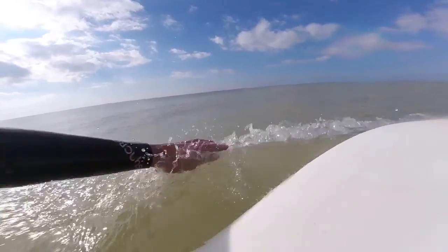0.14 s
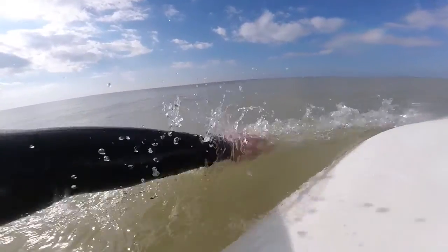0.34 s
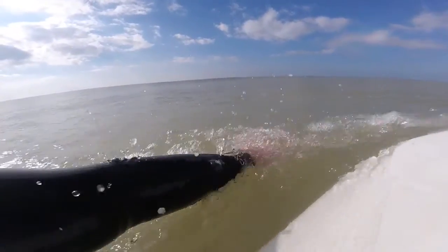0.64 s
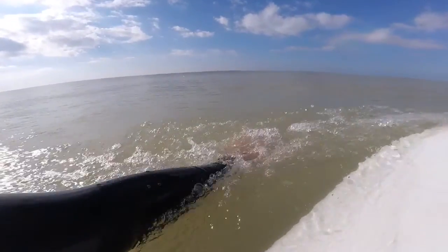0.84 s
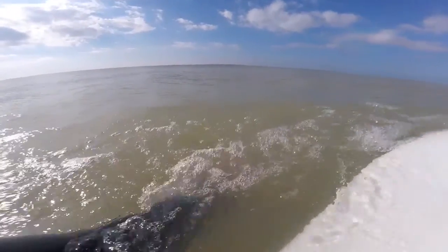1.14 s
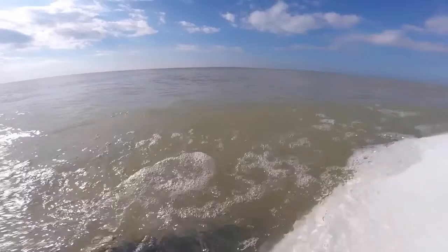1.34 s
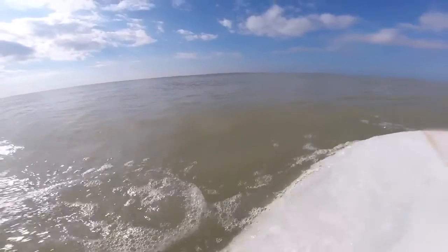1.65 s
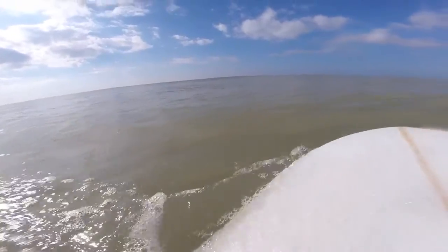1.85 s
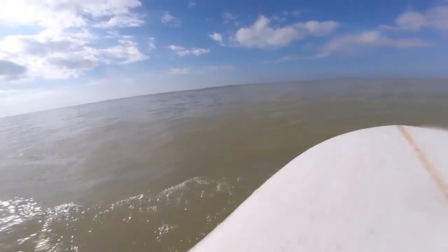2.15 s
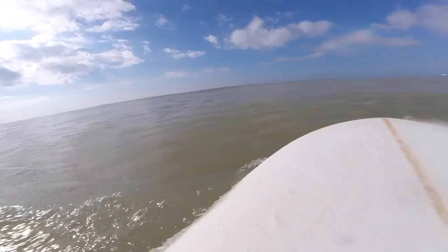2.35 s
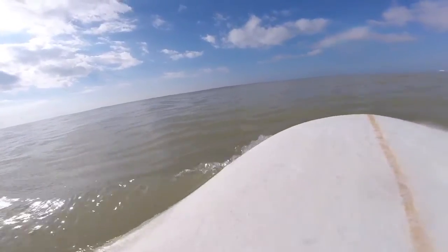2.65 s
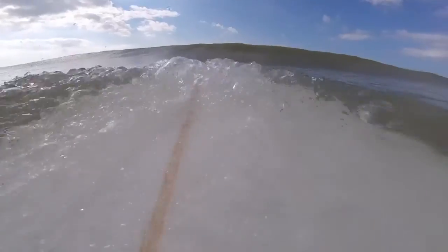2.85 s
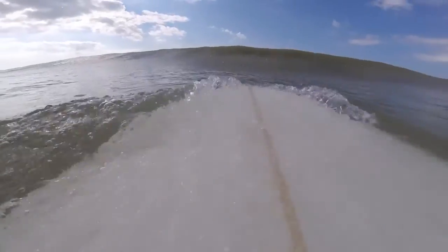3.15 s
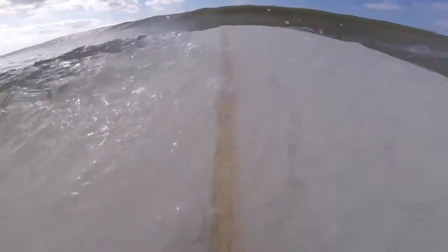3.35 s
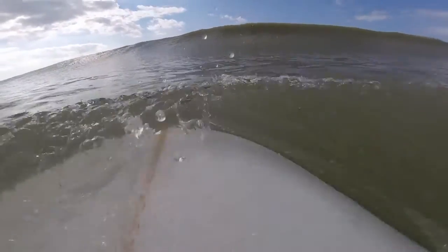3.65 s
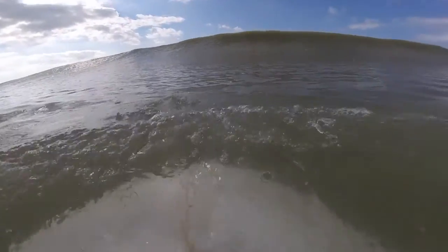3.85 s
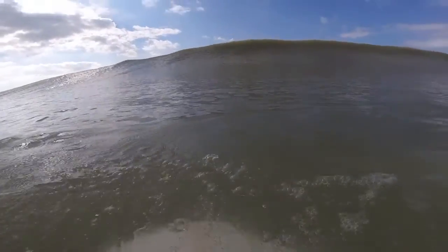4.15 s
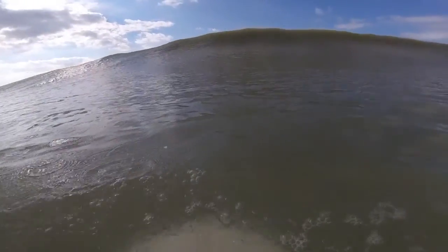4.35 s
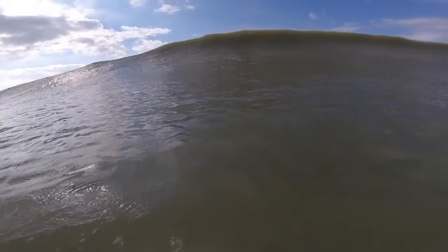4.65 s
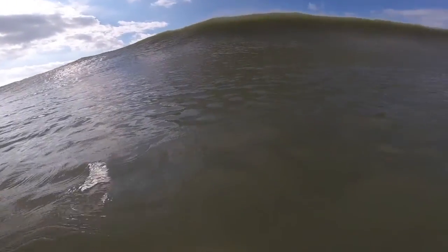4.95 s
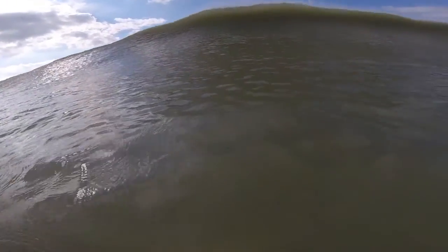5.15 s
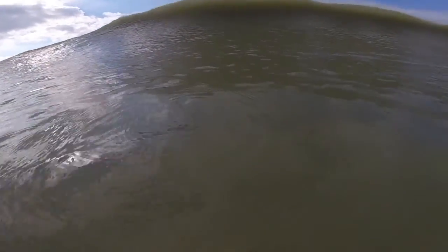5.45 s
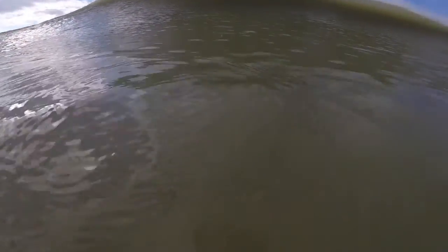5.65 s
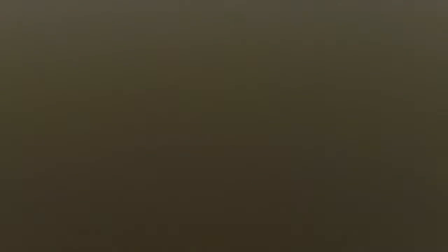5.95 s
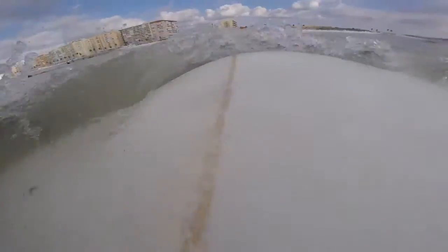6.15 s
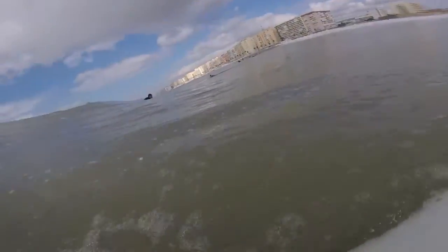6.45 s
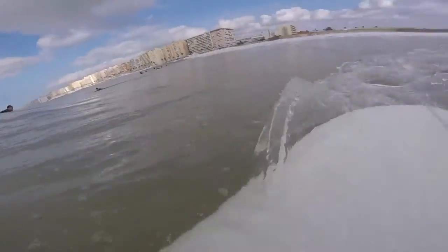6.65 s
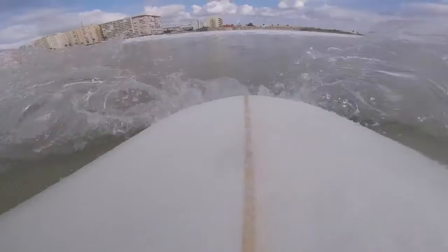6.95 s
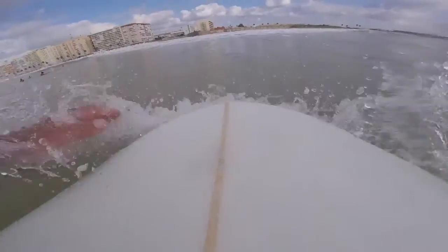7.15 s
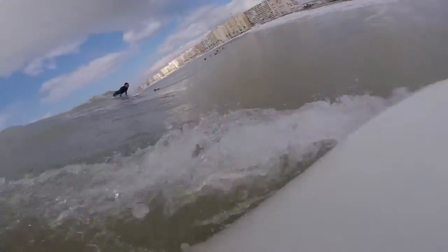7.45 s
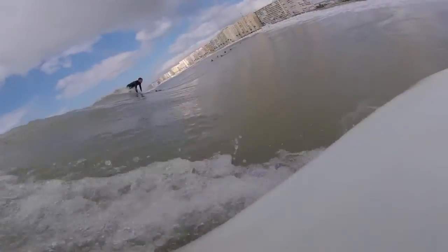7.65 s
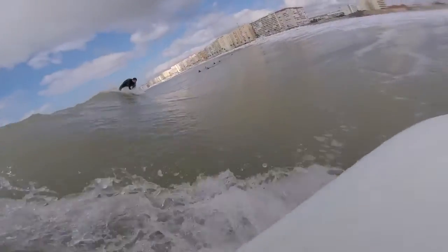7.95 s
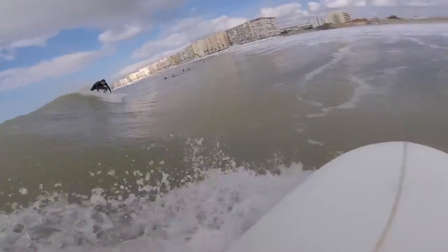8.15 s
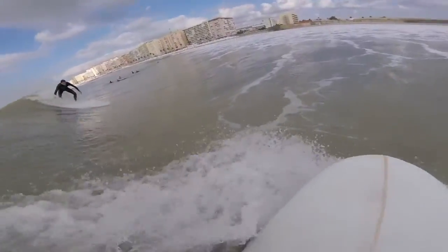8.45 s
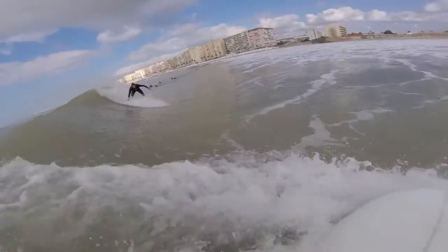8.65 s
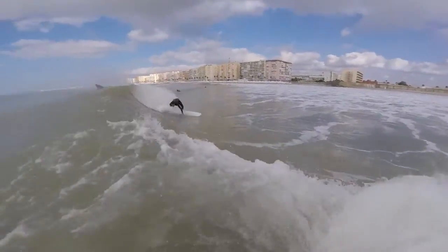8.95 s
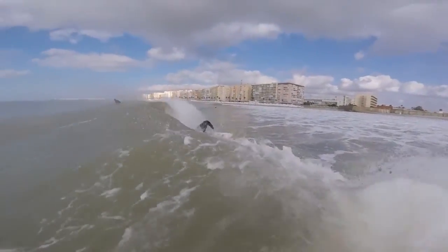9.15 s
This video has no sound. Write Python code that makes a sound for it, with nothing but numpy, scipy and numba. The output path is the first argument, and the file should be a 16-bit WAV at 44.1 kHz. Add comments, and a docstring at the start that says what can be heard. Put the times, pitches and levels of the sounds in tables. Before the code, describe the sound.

Close surf splashing and bubbling along a board, low wind buffeting, a hard underwater gulp, then dull, swelling churn.

```python
"""Surfboard camera ride with a dunk

Wind buffets the camera port, water gurgles and froths along the hull, spray fizzes: band noise plus bubble swarms.
Slaps, large bubbles and drops are damped tones; snaps are pulses; sloshes and splashes are bursts of banded noise.
Four spliced shots, each with its own filter; the first and third play at half speed, so the port rings lower.
A wave dunks the camera late in the third shot; water left in the port muffles the last one."""
import sys
import numpy as np
from scipy import signal
from scipy.fft import rfft, irfft, next_fast_len
from scipy.io import wavfile
from scipy.ndimage import uniform_filter1d
from numba import njit

SR = 44100
rng = np.random.default_rng(int(sys.argv[2]) if len(sys.argv) > 2 else 0)


def put_to_file(sound):
    """Save the sound as 16-bit audio at rate SR, in the file named by the first command-line argument."""
    columns = np.atleast_2d(sound).T  # one column per channel
    safe = np.clip(columns, -1, 1)
    whole_steps = np.round(safe * 32767)
    wavfile.write(sys.argv[1], SR, whole_steps.astype(np.int16))


N = 410118

WIND_TOP_HZ, GURGLE_TOP_HZ, FROTH_TOP_HZ = 110, 900, 2300  # crossovers between the flows
TOP_HZ = 13500  # treble limit
DULL_HZ = 3000  # slaps and bubbles lose treble through water and plastic


def undb(db):
    """Decibels to gain."""
    return 10 ** (np.asarray(db) / 20)


def level(x, db):
    """Scale to an rms level in dB."""
    return x * undb(db) / np.sqrt(np.mean(x ** 2))


@njit
def ring(rows, length, rate):
    """Damped gliding tones from rows (s, size, Hz, Hz/s, t60 s, rise s)."""
    out = np.zeros(length)
    for s, size, hz, glide, t60, rise in rows:
        start = int(s * rate)
        fall = np.exp(-np.log(1000) / (t60 * rate))
        unrisen_decay = np.exp(-1 / (rise * rate))
        step = 2 * np.pi * hz / rate
        step_change = 2 * np.pi * glide / rate ** 2
        phase, unrisen = 0., 1.
        for i in range(start, min(length, start + int(t60 * rate))):
            phase += step
            step = max(step + step_change, 0.)
            size *= fall
            unrisen *= unrisen_decay
            out[i] += size * (1 - unrisen) ** 2 * np.sin(phase)
    return out


def played(table):
    """Ring a table whose second column is a level in dB."""
    rows = np.array(table, float)
    gain = undb(rows[:, 1])
    return ring(np.column_stack([rows[:, 0], gain, rows[:, 2:]]), N, 1. * SR)


def walk(rate):
    """Random levels held for 1 / rate s, then smoothed twice over that time."""
    hold = int(SR / rate)
    steps = np.repeat(rng.standard_normal(N // hold + 1), hold)
    return 1.01 * uniform_filter1d(uniform_filter1d(steps, hold), hold)[:N]


def hiss(lo_hz, hi_hz, surge_db, own_db, rate):
    """Noise in bands half an octave apart that share one surge and flicker alone; rms 1."""
    out = 0
    hz = np.fft.rfftfreq(next_fast_len(N), 1 / SR)
    for centre in np.arange(np.log2(lo_hz), np.log2(hi_hz), .5):
        mask = np.cos(np.pi * np.clip(np.log2(hz + 1e-9) - centre, -.5, .5))
        noise = np.exp(2j * np.pi * rng.random(len(hz))) * np.sqrt(rng.exponential(size=len(hz)))
        band = irfft(mask * noise)[:N]
        out = out + undb(surge_db + own_db * walk(rate)) * band
    return level(out, 0)


def swarm(count, lo_hz, hi_hz, cycles, scatter_db, glide):
    """Bubbles at random times; higher ones tend to die sooner, all rise by a share of their pitch; rms 1."""
    place, pitch, size, life = rng.random((count, 4)).T
    hz = lo_hz + (hi_hz - lo_hz) * pitch
    t60 = cycles * (.5 + life) / hz
    gain = undb(-scatter_db * np.log(1.01 - size)) / np.sqrt(t60)
    rows = np.column_stack([place * N / SR, gain, hz, glide * hz / t60, t60, 0.36 / hz])
    return level(ring(rows, N, 1. * SR), 0)


def crackle(rate, scatter_db):
    """One-sample pops of scattered size and random sign, rate per second; rms 1."""
    size = undb(-scatter_db * np.log(1.005 - rng.random(N)))
    return level((rng.random(N) < rate / SR) * size * rng.choice([-1, 1], N), 0)


# shot boundaries: (time [s])
CUTS_S = [0, 2.733, 3.483, 6.005, 9.4]
# relative colour through the housing, one list per shot: (frequency [Hz], density [dB per Hz])
COLOURS = [
    [(15, -7), (25, -2.5), (118, -12), (205, -13.5), (391, -18.5), (1240, -26), (2110, -36), (2750, -30),
     (3210, -19.5), (3830, -27.5), (4680, -29.5), (5000, -34.5), (6500, -77.5), (11000, -120)],
    [(15, -40.5), (25, 3), (41, -29), (60, -22.5), (203, -25), (262, -23), (384, -22.5), (563, -24),
     (805, -23), (2810, -26.5), (4230, -31.5), (5900, -30.5), (6530, -18.5), (9340, -33), (11200, -54),
     (14500, -77), (22000, -120)],
    [(15, -25.5), (25, 5.5), (49, -1), (169, -9.5), (278, -10), (458, -15.5), (865, -19), (2250, -33),
     (2880, -27.5), (3300, -16), (3620, -22), (4750, -33.5), (5700, -49), (7410, -57), (12500, -120)],
    [(15, -34.5), (25, 0), (81, -4.5), (161, -3.5), (230, -8.5), (356, -10), (593, -14.5), (1070, -16.5),
     (1650, -14.5), (1870, -17.5), (2650, -30.5), (3630, -44.5), (4570, -57), (5900, -55.5), (6530, -44.5),
     (11200, -69.5), (14500, -103), (22000, -120)],
]
# port resonances and treble limit per shot: ([(frequency [Hz], width [Hz], boost [dB])], top [Hz])
PORTS = [([(2720, 150, 10), (3310, 93, 8.5)], 4990), ([(6570, 250, 6)], 11600), ([(3233, 70, 8)], 5750),
         ([(1645, 630, 6), (6400, 250, 2.5)], 36000)]
CROSSFADE_S = .008


def housing(x, lo_hz, hi_hz):
    """Each shot colours the band lo-hi with its own causal response; rms 1 per shot before fades."""
    out, size = np.zeros(N), 2 ** 18
    hz = np.fft.rfftfreq(size, 1 / SR) + 1e-3
    edges = -10 * np.log10((1 + (lo_hz / hz) ** 6) * (1 + (hz / hi_hz) ** 6))
    for colour, (peaks, top_hz), t0, t1 in zip(COLOURS, PORTS, CUTS_S, CUTS_S[1:]):
        f, db = np.transpose(colour)
        db = np.interp(np.log(hz), np.log(f), db) + edges
        db = db - 10 * np.log10(1 + (hz / top_hz) ** 80)
        db = db + sum(boost / (1 + (2 * (hz - at) / width) ** 2) for at, width, boost in peaks)
        # folded cepstrum = minimum phase: grains keep sharp starts
        cep = irfft(np.log(undb(db) + 1e-9))
        cep = np.r_[cep[0], 2 * cep[1:size // 2], np.zeros(size // 2)]
        response = np.exp(rfft(cep))
        a, b = max(int(t0 * SR) - SR // 4, 0), min(int(t1 * SR), N)
        shot = level(irfft(rfft(x[a:b], size) * response)[:b - a], 0)
        # fade in just before the cut while the previous shot fades out
        t = np.arange(a, b) / SR
        fade = np.clip((t - t0) / CROSSFADE_S + 1, 0, 1) * np.clip((t1 - t) / CROSSFADE_S, 0, 1)
        out[a:b] += np.sin(fade * np.pi / 2) * shot
    return out


def shot_top(x):
    """Single events lose the treble above the limit of their shot."""
    out = np.zeros(N)
    for (_, top_hz), t0, t1 in zip(PORTS, CUTS_S, CUTS_S[1:]):
        a, b = int(t0 * SR), int(t1 * SR)
        lowpass = signal.butter(9, min(top_hz, TOP_HZ), fs=SR, output="sos")
        out[a:b] = signal.sosfiltfilt(lowpass, x)[a:b]
    return out


def wind(surge):
    """Gusty pressure swings on the port: flickering low noise."""
    surge_db = 2.0 * surge + 1.0 * walk(7.8)
    return housing(hiss(11.94, 250, surge_db, own_db=5.0, rate=8.6), 21, WIND_TOP_HZ)


def gurgle(surge):
    """Churning water along the hull with larger bubbles in it."""
    plops = swarm(count=3500, lo_hz=88.5, hi_hz=1409, cycles=14.8, scatter_db=2.5, glide=0.25)
    churn = hiss(60.1, 2000, 2.9 * surge, own_db=1.0, rate=20)
    return housing(churn + undb(-3.0 + 2.2 * surge) * plops, WIND_TOP_HZ, GURGLE_TOP_HZ)


def froth(surge, patchy, blips_db, crackle_db):
    """Pea-sized bubbles that blip upwards and pop out of a soft rush."""
    blips = swarm(count=1400, lo_hz=481.4, hi_hz=3625, cycles=44, scatter_db=4.0, glide=0.32)
    rush = hiss(445, 4500, 1.0 * surge, own_db=2.4 * patchy, rate=22)
    grains = undb(blips_db) * blips + undb(crackle_db) * crackle(400, scatter_db=5.0)
    return housing(rush + undb(0.89 * surge) * grains, GURGLE_TOP_HZ, FROTH_TOP_HZ)


def spray(surge, patchy):
    """Fizz of tiny bursting bubbles and one-sample crackle over a breathing hiss."""
    fizz = swarm(count=10000, lo_hz=1538, hi_hz=13160, cycles=43, scatter_db=4.0, glide=0.3)
    foam = hiss(1133, 16000, 0.96 * surge, own_db=5.2 * patchy, rate=28)
    grains = undb(-4.5) * fizz + undb(-4.0) * crackle(500, scatter_db=3.5)
    return housing(foam + patchy * undb(0.73 * surge) * grains, FROTH_TOP_HZ, 20000)


# water slapping the housing, before rise and filters: (time [s], level [dB], pitch [Hz], t60 [s])
SLAPS = [(0.012, -9.5, 27, 0.17), (.115, -10, 20, 0.12), (0.701, -7.5, 35, 0.073), (3.408, -1, 45.5, 0.11),
         (3.49, -12, 16, 0.34), (3.63, -7.5, 10, 0.15), (4.09, -14.5, 18.6, 0.28), (5.963, 1, 406, 0.016),
         (5.9641, -4, 930, 0.0085), (5.96, -3, 55, 0.075), (5.99, 0.5, 350, 0.012),
         (5.993, -3, 730, 0.0066), (6.032, -14, 470, 0.019), (6.14, -9.5, 278, 0.038),
         (6.548, -7, 95, 0.091), (6.675, -16.5, 42, .12), (6.716, -11.5, 47, 0.067), (6.865, -7, 25, 0.13),
         (6.93, -11.5, 43, .072), (7.137, -9.5, 870, 0.0078), (7.515, -9.5, 18, 0.13),
         (9.005, -14, 24, .25), (9.0462, -8.5, 460, 0.0061), (9.049, -16, 56, 0.037)]
SLAP_RISE, SLAP_SAG = 0.056, 0.31  # rise [share of t60]; pitch lost over t60 [share]


def slaps():
    """Dull blows that rise in step with their ring and sag in pitch."""
    return played([(s, db, hz, -SLAP_SAG * hz / t60, t60, SLAP_RISE * t60) for s, db, hz, t60 in SLAPS])


# single large bubbles, before rise and filters: (time [s], level [dB], start pitch [Hz], t60 [s])
BUBBLES = [(.042, -7.5, 175, 0.038), (.403, -23, 487, .04), (.53, -21, 497, 0.056),
           (0.556, -16, 1120, 0.013), (.729, -20, 543, 0.025), (.753, -23.5, 1290, 0.02),
           (.973, -19, 1280, 0.016), (1.016, -23, 1700, .015), (1.034, -17.5, 1550, 0.013),
           (1.082, -22, 1100, 0.023), (1.17, -27, 740, .03), (2.742, -25, 2150, 0.031),
           (2.85, -23, 1000, 0.027), (2.888, -14.5, 750, 0.028), (2.975, -26, 895, 0.07),
           (3.019, -25, 870, .03), (3.063, -24, 710, 0.02), (3.111, -26, 1350, 0.025),
           (3.252, -27, 1500, 0.063), (3.288, -26, 446, .03), (3.314, -18.5, 1490, 0.023),
           (3.355, -24, 810, 0.02), (3.332, -17, 956, 0.023), (3.384, -20, 1000, 0.034),
           (3.465, -19.5, 370, 0.053), (3.635, -20.5, 468, .057), (3.76, -28, 940, .03),
           (3.805, -11, 168, 0.068), (3.842, -26, 720, 0.032), (3.89, -26, 880, .03),
           (3.865, -12, 280, 0.044), (3.946, -22.5, 390, 0.046), (3.998, -25.5, 820, 0.029),
           (4.03, -24.5, 330, .04), (4.038, -26, 670, 0.038), (4.065, -21, 177, 0.089),
           (4.068, -25, 550, .03), (4.104, -25, 490, 0.027), (4.133, -28, 1080, .025),
           (4.33, -24, 620, .025), (4.578, -23, 745, 0.018), (5.9825, -4, 164, 0.04),
           (6.032, -8, 855, 0.01), (6.1366, 2, 116, 0.05), (6.563, 6.5, 44, 0.036),
           (9.0464, 3, 1420, 0.0047), (9.23, -22, 640, 0.018), (9.269, -8.5, 89.5, 0.05)]
# air pockets, one glugs upwards as it fills, two hum downwards while trapped:
# (time [s], level [dB], start pitch [Hz], glide [Hz/s], t60 [s], rise [s])
POCKETS = [(4.375, -18, 66, 3050, 0.36, 0.012), (6.0015, -16, 738, -14000, 0.047, 0.0011),
           (6.014, -18, 587, -2000, 0.05, 0.0013)]
BUBBLE_RISE = 0.082  # share of t60
GLIDE_HZ_PER_S, GLIDE_SHARE = 330, 0.32  # constant, plus share of the pitch gained over t60


def bubbles():
    """Bubbles glide upwards, faster when high and short; air pockets follow their own glides."""
    rows = [(s, db, hz, GLIDE_HZ_PER_S + GLIDE_SHARE * hz / t60, t60, BUBBLE_RISE * t60)
            for s, db, hz, t60 in BUBBLES]
    return played(rows + POCKETS)


# drops hitting the housing, plus the port ringing once during the dunk (6.1378 s), before rise and filters: #
# (time [s], ring level [dB], ring pitch [Hz], spatter relative to ring [dB])
DROPS = [(0.049, -24, 2780, -23), (0.1725, -16, 2820, -24), (.181, -27, 2900, -8), (0.1893, -16, 2800, -18),
         (0.2099, -8.5, 2800, -8), (.221, -14, 2800, -6), (0.2428, -12.5, 2780, -15),
         (0.3135, -16.5, 2780, -14), (0.3378, -5.5, 2860, -18), (0.3622, -22.5, 3250, 0.5),
         (.419, -20.5, 3240, -5.5), (0.5015, -15.5, 2700, -24), (0.5548, -21, 3300, -10),
         (.606, -25, 3270, -10), (.66, -23, 3250, -12), (0.693, -27.5, 3280, 1), (0.852, -26.5, 3190, -4.5),
         (.9135, -22, 3360, -6.5), (.9743, -23, 3630, -7.5), (1.0174, -24, 2620, -4),
         (1.098, -21, 2950, -11), (1.0835, -18, 3260, -7.5), (1.1225, -19, 3320, -9.5),
         (1.24, -22.5, 3100, -10), (1.4643, -25, 3220, 3), (2.0015, -22, 2730, -18),
         (2.0025, -20, 3130, -15), (2.8609, -22, 8000, -7), (3.201, -23, 7200, -10.5),
         (3.9762, -28.5, 3330, -5), (3.9996, -26, 3480, -9), (4.022, -27, 3280, -8),
         (4.1902, -24, 3650, -11.5), (4.5633, -26.5, 3260, -11), (4.583, -29, 3290, -4),
         (5.7947, -23, 3470, -12), (5.806, -12.5, 3160, -8.5), (5.9617, -38, 3180, 4.5),
         (6.1378, -31.5, 6550, -30), (6.436, -20, 1720, -25), (6.476, -22, 1790, -25),
         (6.5135, -32, 2300, -4), (6.584, -40, 3430, -5), (7.266, -19, 1500, -25), (7.2777, -8, 1580, -28),
         (7.288, -18, 1550, -20), (7.364, -19, 1650, -21), (7.3908, -23, 1740, -11),
         (7.4082, -11.5, 1700, -19.5), (7.422, -14, 1600, -25), (7.69, -10, 1560, -30),
         (7.8903, -15, 1610, -27), (8.0294, -15.5, 1420, -16), (8.107, -9.5, 1540, -28),
         (8.2313, -10, 1720, -29), (8.5618, -12, 1590, -28), (8.6865, -10.5, 1320, -30),
         (9.249, -20, 1800, -14.5)]
RING_T60_S, WET_RING_T60_S, SPATTER_T60_S = 0.015, 0.013, 0.03  # wet: last shot


def drops():
    """Each drop rings briefly at its own pitch and spatters a burst of wide noise."""
    burst, t = np.zeros(N), np.arange(2000) / SR
    shape = undb(-60 * t / SPATTER_T60_S) * (1 - np.exp(-(t / 0.00053) ** 2))
    rings = []
    for s, db, hz, spatter_db in DROPS:
        start = int(s * SR)
        burst[start:start + len(t)] += undb(db + spatter_db) * shape
        t60 = RING_T60_S if s < CUTS_S[3] else WET_RING_T60_S
        rings.append((s, db, hz, 0, t60, .0007))
    spatter = burst * housing(rng.standard_normal(N), 2000, 20000)
    return spatter + played(rings)


# snaps as the water film over the port breaks, before filters: (time [s], peak [dB], corner [Hz])
SNAPS = [(0.6937, -11, 282), (5.992, -25, 900), (6.098, -42, 2500), (6.1375, -8, 500), (6.162, -38, 3000),
         (6.577, -38, 2960), (9.0095, -27, 1500)]


def snaps():
    """Sudden pushes that relax at once: wide clicks, duller above their corner."""
    out, t = np.zeros(N), np.arange(200) / SR
    for s, db, hz in SNAPS:
        start, turn = int(s * SR), 2 * np.pi * hz * t
        out[start:start + len(t)] += undb(db) * turn * np.exp(1 - turn)
    return out


# sloshing and splashing bursts during and after the dunk, before rise and decay:
# (time [s], level [dB], low edge [Hz], high edge [Hz], t60 [s], rise [s])
SLOSHES = [(5.965, -28, 120, 694, 0.054, 0.0018), (5.994, -30.5, 150, 1150, 0.091, .003),
           (6.05, -11, 800, 1580, 0.07, 0.023), (6.139, -26.5, 150, 536, 0.056, 0.0018),
           (6.565, -46, 2800, 3900, 0.14, 0.021), (6.678, -47, 2800, 3960, 0.1, 0.018)]


def sloshes():
    """Sloshes and splashes: bands of noise that well up and die away."""
    out, t = np.zeros(N), np.arange(8000) / SR
    for s, db, lo_hz, hi_hz, t60, rise in SLOSHES:
        bandpass = signal.butter(4, [lo_hz, hi_hz], "band", fs=SR, output="sos")
        band = level(signal.sosfilt(bandpass, rng.standard_normal(len(t))), db)
        start = int(s * SR)
        out[start:start + len(t)] += band * undb(-60 * t / t60) * np.minimum(t / rise, 1) ** 2
    return out


# gusts on the port: (peak time [s], lift [dB], length [s]); shares scale each lift
GUSTS = [(.005, 13, 0.26), (.46, 6, 0.063), (.58, 9, 0.11), (2.02, 7.5, 0.15), (6.66, 13.5, 0.34),
         (7.05, 11, 0.11), (7.72, 11.5, 0.4), (8.45, -8, 0.1), (9.28, 12, 0.082)]
# water heaving against the hull: (peak time [s], lift [dB], length [s])
HEAVES = [(1.13, 3.7, 0.15), (3.7, 6.2, 0.26), (3.8, 4, .06), (3.89, 12.6, 0.045), (4.05, 6.9, 0.075),
          (7.15, 6.2, 0.095), (8.2, 12.7, 0.097), (8.265, 10.2, 0.047), (8.76, 11.5, 0.15),
          (9.295, 13.4, 0.038)]
# splashes from the hand and the rails: (peak time [s], lift [dB], length [s])
SPLASHES = [(.225, 9.5, 0.13), (.4, 6.7, 0.077), (.59, 3.9, 0.1), (.9, 7.2, 0.091), (1.06, 8.1, 0.23),
            (2.84, 7.2, 0.15), (3.35, 6.1, 0.038), (4.03, 4, 0.046), (5.83, 4.5, 0.052), (6.59, 6, .05),
            (6.7, 3.9, 0.039), (7.3, 2.6, 0.45), (7.91, 4.5, 0.055), (8.1, 5.8, 0.22), (9.24, 5.5, 0.06)]
# share of a lift reaching (wind, gurgle, froth, spray)
GUST_SHARES, HEAVE_SHARES = (0.86, 0.042, .05, .05), (0.42, 0.69, 0.14, 0.044)
SPLASH_SHARES = (.05, .3, .9, 1)
CLIMB_SHARE = 0.69  # climb time as a share of the length


def swells(table, shares):
    """Lifts in dB for the four flows: each climbs to its peak, then sinks over its length."""
    t = np.arange(N) / SR
    lift = sum(np.interp(t, [s - CLIMB_SHARE * length, s, s + length], [0, db, 0])
               for s, db, length in table)
    return np.outer(shares, lift)


# water closing the port: (shut time [s], clearing start [s], clearing length [s], fullness [0-1])
SHUTS = [(5.889, 6.019, .03, 0.93), (6.094, 6.133, .3, 0.57), (9.001, 9.35, .1, 0.29)]
SHUT_DB = (-18, -32.5, -37.5, -31.5)  # wind, gurgle, froth, spray at fullness 1
SHUT_S, SEAL_S, SUDDEN_SHARE = 0.0054, 0.026, 0.89  # sudden drop, then seal; share lost in the drop


def port_loss():
    """Level change in dB of the four flows under water: a sudden drop, a slower seal, then clearing."""
    t, shut = np.arange(N) / SR, 0
    for s, clear, length, full in SHUTS:
        closing = np.interp(t, s + np.cumsum([0, SHUT_S, SEAL_S]), [0, SUDDEN_SHARE, 1])
        shut = shut + full * closing * np.interp(t, [clear, clear + length], [1, 0])
    return np.outer(SHUT_DB, shut)


# slow course of the flows, before swells and port loss:
# (time [s], wind [dB], gurgle [dB], froth [dB], spray [dB])
FLOW = [(0, -34.5, -38.5, -49.5, -46), (.6, -40, -41.5, -43, -42), (1.15, -44, -43, -50, -49),
        (1.3, -41.5, -46.5, -56.5, -48), (1.75, -42.5, -46, -52, -49), (2.301, -41.5, -45, -44.5, -39),
        (2.725, -44, -40, -47.5, -45), (2.738, -49.5, -44, -48.5, -48), (3.15, -36.5, -42, -44, -44.5),
        (3.47, -41, -39.5, -45, -43.5), (3.491, -42.5, -42, -48, -50), (4.2, -43.5, -41, -48.5, -47),
        (5.05, -43, -42.5, -47.5, -40), (5.621, -40.5, -36, -42.5, -33), (5.884, -42, -29, -37.5, -28.5),
        (6.04, -52, -35, -41, -49), (6.1, -44, -33, -40.5, -49), (6.25, -50, -45.5, -42, -50),
        (6.55, -45.5, -47, -46, -52.5), (6.85, -44, -44, -43.5, -55), (7.15, -42.5, -39.5, -39, -48.5),
        (7.7, -43, -36, -37.5, -47.5), (8.1, -32.5, -28.5, -35, -47.5), (8.5, -31, -32, -33, -41.5),
        (9.0, -35.5, -26, -33.5, -43), (9.3, -33, -19.5, -31.5, -49.5)]
# how broken the water is: (time [s], patchiness of froth and spray [0-2], blips [dB], froth crackle [dB])
CHOP = [(0, 1.45, -4, -9), (1.2, 1.35, -4.5, -6.5), (2.6, .5, -5, -9), (2.8, 1.2, -0.5, -11),
        (4.1, .9, -5, -13.5), (4.65, 0.53, -7.5, -16.5), (5.9, .35, -7.5, -18), (6.3, 0.67, -9.5, -10),
        (9.3, .6, -12.5, -6)]


def scene():
    """Four flows share the water's surges, lifted by swells and cut by the wet port, plus single events."""
    t = np.arange(N) / SR
    s, *levels = np.transpose(FLOW)
    db = np.array([np.interp(t, s, column) for column in levels]) + port_loss()
    db = db + swells(GUSTS, GUST_SHARES) + swells(HEAVES, HEAVE_SHARES) + swells(SPLASHES, SPLASH_SHARES)
    s, *chop = np.transpose(CHOP)
    patchy, blips_db, crackle_db = (np.interp(t, s, column) for column in chop)
    surge = walk(14)
    layers = (wind(surge), gurgle(surge), froth(patchy * surge, patchy, blips_db, crackle_db),
              spray(patchy * surge, patchy))
    flows = sum(gain * layer for gain, layer in zip(undb(db), layers))
    lowpass = signal.butter(4, DULL_HZ, fs=SR, output="sos")
    dull = signal.sosfilt(lowpass, slaps() + bubbles())
    events = shot_top(dull + drops() + snaps() + sloshes())
    return (flows + events)[None]


def record(dry):
    """Removes the deepest rumble and cuts the top."""
    dry = signal.sosfilt(signal.butter(1, 12, "high", fs=SR, output="sos"), dry)
    return signal.sosfilt(signal.ellip(8, .2, 70, TOP_HZ, fs=SR, output="sos"), dry)


dry = scene()
out = record(dry)
put_to_file(out)
```